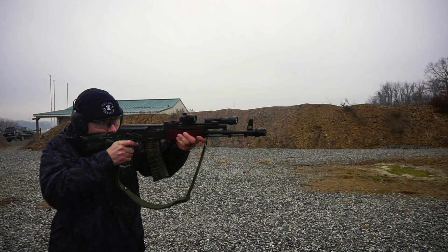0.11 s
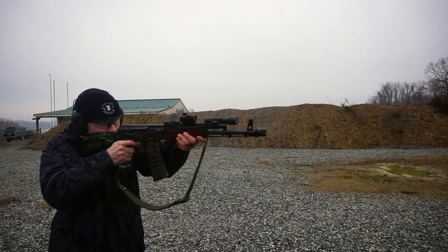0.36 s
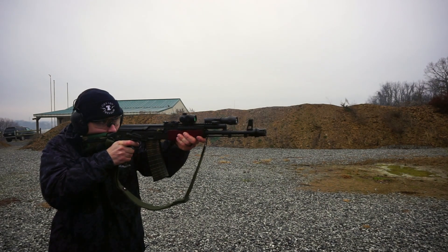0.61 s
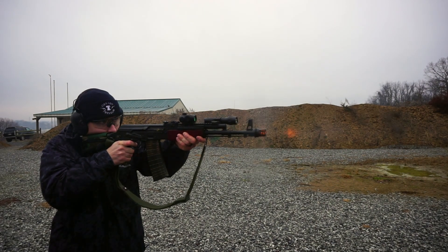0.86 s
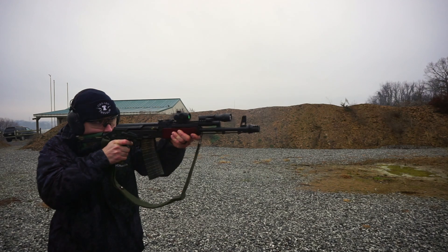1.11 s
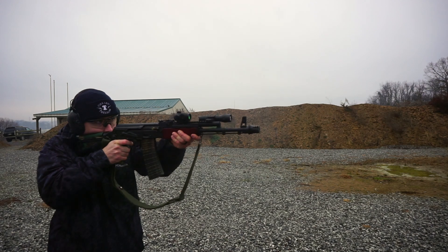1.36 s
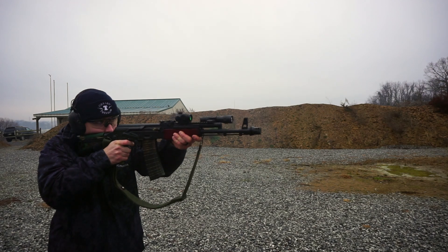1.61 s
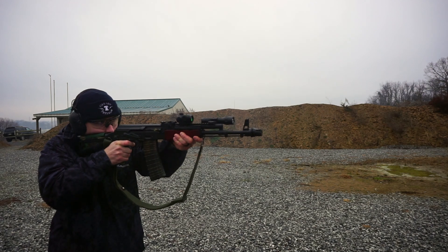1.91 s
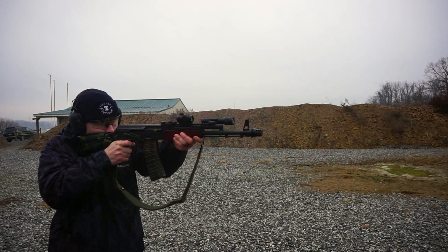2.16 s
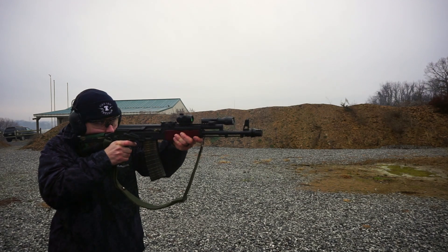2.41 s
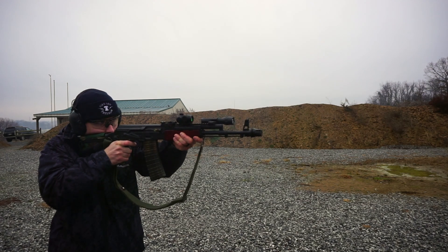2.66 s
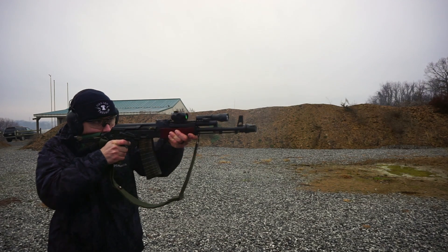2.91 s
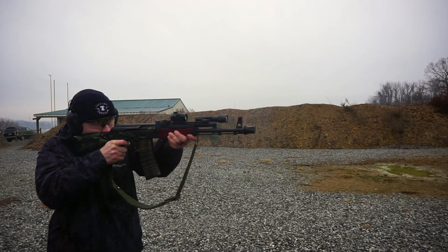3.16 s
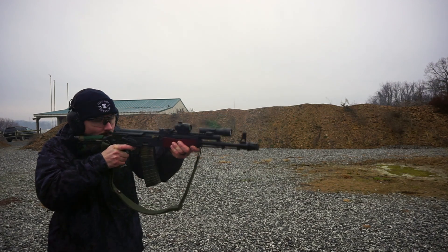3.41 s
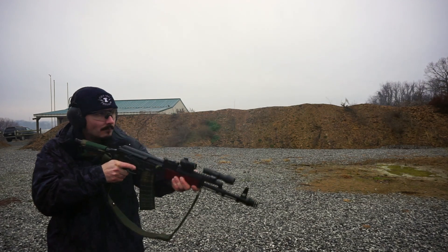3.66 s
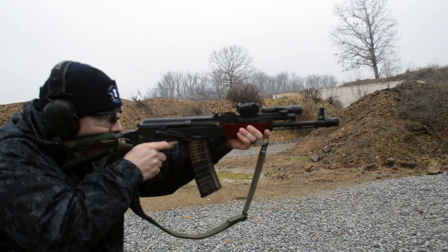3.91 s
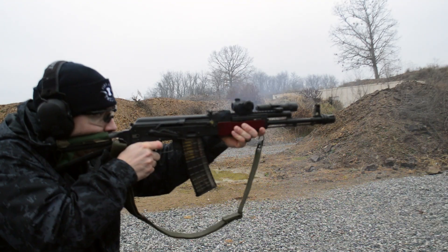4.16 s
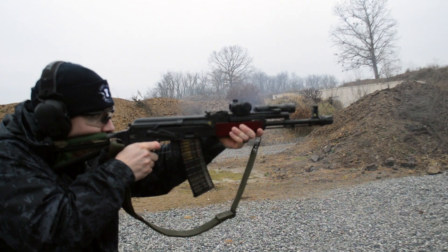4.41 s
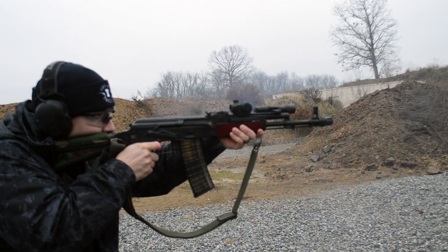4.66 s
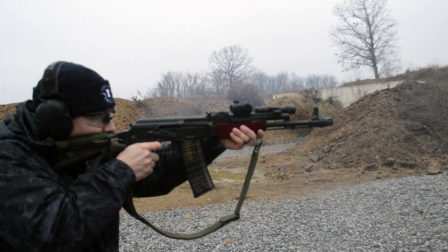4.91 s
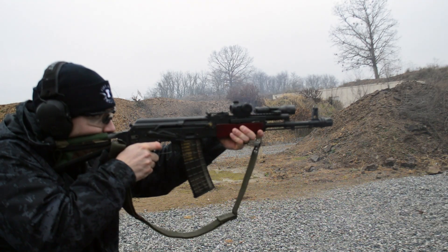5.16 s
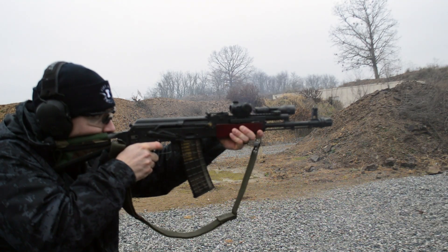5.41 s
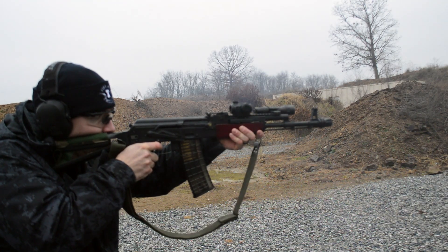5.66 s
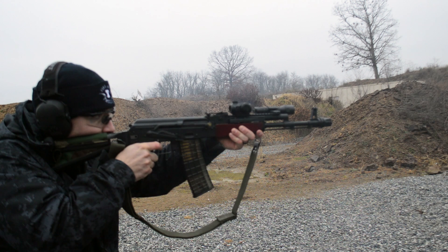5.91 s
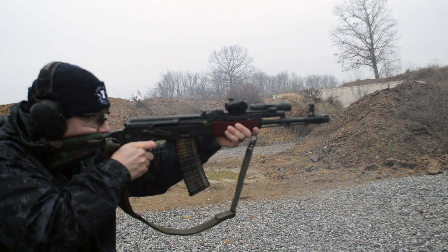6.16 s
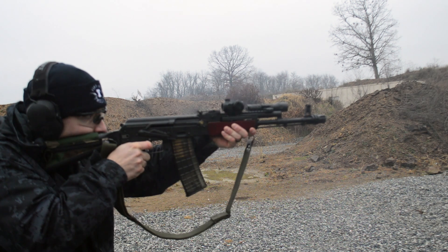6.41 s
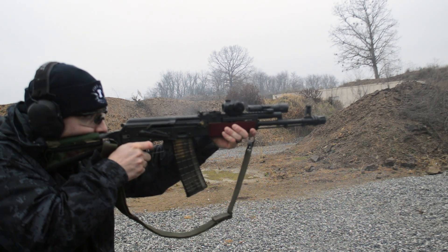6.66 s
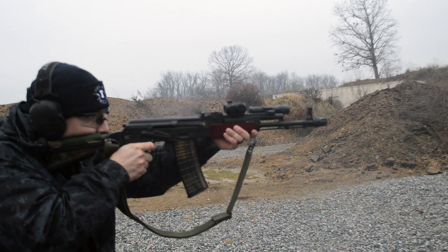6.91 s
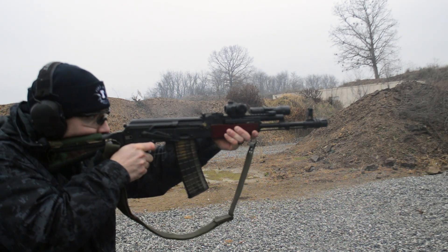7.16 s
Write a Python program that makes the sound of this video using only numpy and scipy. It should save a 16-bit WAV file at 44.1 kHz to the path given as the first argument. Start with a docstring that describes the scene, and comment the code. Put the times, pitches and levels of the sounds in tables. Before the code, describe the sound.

An outdoor gravel range between earth banks, light low wind. It opens on the fading roll of an earlier shot, with tiny brass clinks on stones in the first 0.3 s. At about 0.9 s a rifle shot cracks, restrained in stereo, with bolt clatter, sharp slaps off the banks within a third of a second, and a long, dulling echo. A case clicks around 1.9 and 2.3 s. A second similar shot comes at 2.8 s, with a case ticking at 3.3 s. At 3.8 s the sound cuts to a close mono microphone with louder windy hiss. A small tick, then at 4.0 s a huge overloaded blast with hard slaps and rolling echo. A low hum wavers from 4.9 to 5.9 s; brass rings brightly at 5.2-5.4 s. Another loud blast hits at 6.05 s, its echoes fading as a last case tinkles from 7.0 to 7.25 s.

```python
"""Rifle shots roll across an open gravel range between earth banks: crack, blast, bolt clatter, slaps off
the banks, a long roll of echoes, and spent cases bouncing on the stones. A stereo camera that holds the
blast down is heard first, then, after a cut, a louder mono camera that overloads; a low hum swells late.
Shaped noise makes the crack, clatter, roll, wind and hum; pressure pulses make the slaps; decaying sines
make the brass."""
import sys
import numpy as np
from scipy import signal
from scipy.fft import rfft, irfft, next_fast_len
from scipy.io import wavfile
from scipy.ndimage import uniform_filter1d

SR = 44100
rng = np.random.default_rng(int(sys.argv[2]) if len(sys.argv) > 2 else 0)


def voltage_ratio(decibels):
    """Convert decibels (scalar or array-like) to amplitude ratios, 20 dB per decade."""
    exponent = np.asarray(decibels, float) / 20
    return 10 ** exponent


def wav_record(signal):
    """Record a signal, one row per channel, as 16-bit PCM in the file named by sys.argv[1]."""
    frames = np.transpose(np.atleast_2d(signal))
    bounded = np.clip(frames, -1, 1)
    # unit amplitude maps onto the largest positive 16-bit level
    quanta = np.round(bounded * 32767).astype(np.int16)
    wavfile.write(sys.argv[1], SR, quanta)


N = 321489
CUT_S = 3.777  # wide camera before, close camera after

# spectrum of bright sounds at the rifle, close camera: (frequency [Hz], relative level [dB])
CLOSE_BRIGHT = [(880, 3), (1500, -2.5), (1830, 1), (2830, -0.5), (4000, 0.5), (4690, -3), (7540, -0.5),
                (10600, -7.5), (16000, -6)]
# band of the far drone and the hum, close camera: (centre [Hz], width [Hz])
CLOSE_DRONE = (254, 62)


def evened(x):
    """Scales to an rms of 1."""
    return x / np.sqrt(np.mean(x ** 2) + 1e-20)


def read(points, hz):
    """Interpolates a curve over log frequency."""
    f, value = np.transpose(points)
    return np.interp(np.log(hz + 1), np.log(f + 1), value)


def add(mix, start_s, sound):
    """Adds a sound in place, trimming what falls outside the mix."""
    at = round(start_s * SR)
    part = mix[..., max(at, 0):][..., :max(sound.shape[-1] + min(at, 0), 0)]
    part += sound[..., max(-at, 0):][..., :part.shape[-1]]


def colour(x, points):
    """Filters by a spectrum and sets the rms to 1."""
    hz = np.fft.rfftfreq(x.shape[-1], 1 / SR)
    return evened(irfft(rfft(x) * voltage_ratio(read(points, hz)), x.shape[-1]))


def band_noise(noise, band):
    """Limits noise to a (centre [Hz], width [Hz]) band at an rms of 1."""
    centre_hz, width_hz = band
    edges_hz = [centre_hz - width_hz / 2, centre_hz + width_hz / 2]
    return evened(signal.sosfilt(signal.butter(2, edges_hz, "band", fs=SR, output="sos"), noise))


def stereo(mid, side, wide):
    """Two close capsules: bass alike, treble unrelated."""
    # (frequency [Hz], side minus mid [dB] at wide = 1)
    spread = [(60, -22.5), (150, -42), (380, -15), (950, -1.5), (2380, 1), (5980, 5.5), (15000, 1)]
    hz = np.fft.rfftfreq(len(side), 1 / SR)
    side = wide * irfft(rfft(side) * voltage_ratio(read(spread, hz)), len(side))
    return np.array([mid + side, mid - side])


def burst(t, hold_s, t60_s):
    """Envelope of an impact: 0.39 ms rise, hold, exponential decay."""
    return np.clip(t / 0.00039, 0, 1) * voltage_ratio(-60 * np.maximum(t - hold_s, 0) / t60_s)


def ringing(noise, hz, q=3., db=-5.):
    """Noise with a broad resonance laid over it."""
    peak = signal.lfilter(*signal.iirpeak(hz, q, fs=SR), noise)
    return evened(noise + voltage_ratio(db) * evened(peak))


def echoes(t, rows, swell_db_per_s):
    """Levels of thud and hiss: each answer swells, holds and fades; their powers add."""
    s, thud_db, hiss_db, hold_s, fade_db_per_s = np.transpose(rows)[..., None]
    early_s, late_s = np.maximum(s - t, 0), np.maximum(t - s - hold_s, 0)
    shape = voltage_ratio(-swell_db_per_s * early_s - fade_db_per_s * late_s)
    return [np.sqrt(((voltage_ratio(db) * shape) ** 2).sum(0)) for db in (thud_db, hiss_db)]


def swells(t, rows):
    """Level of the drone: swells tent-shaped in dB whose powers add."""
    s, db, fall_s = np.transpose(rows)[..., None]
    return np.sqrt((voltage_ratio(db - 10 * abs(t - s) / fall_s) ** 2).sum(0))


def blast(db, ms):
    """Overpressure then suction, rounded by the way it has travelled."""
    ms = np.clip(ms, .12, .6)
    u = np.arange(400) / SR / (ms / 1000)
    band = signal.butter(2, [230, 400 / ms], "band", fs=SR, output="sos")
    wave = signal.sosfilt(band, (1 - u) * np.exp(-u))
    return voltage_ratio(db) * wave / abs(wave).max()


def tree_hiss(noise, hiss, t, lead_s, wide):
    """Treble of the roll, duller the longer its path through the air."""
    # extra loss in the air: (frequency [Hz], wide camera's paths [dB/s], close camera's paths [dB/s])
    air_loss = [(2500, 0, 1), (3670, 6.5, 6.5), (5460, 18.5, 17), (8000, 35.5, 29.5), (11730, 54.5, 72),
                (16000, 88.5, 86)]
    hz, frame_s, z = signal.stft(colour(noise, hiss), SR, nperseg=512)
    loss_db_per_s = read([(f, loss[0] if wide else loss[1]) for f, *loss in air_loss], hz)[:, None]
    path_s = np.clip(frame_s - lead_s, 0, 1)  # echoes after 1 s grow no duller
    trees = signal.istft(z * voltage_ratio(-loss_db_per_s * path_s), SR, nperseg=512)[1][:, :len(t)]
    # unit level in 1.5-4 kHz over the first quarter second
    reference = signal.butter(4, [1500, 4000], "band", fs=SR, output="sos")
    return trees / signal.sosfilt(reference, trees[0, :SR // 4]).std()


def shot(hits, knocks, slaps, roll, swell_db_per_s, drones, thud, hiss, bright, drone, ground, wide):
    """The ground scatters every shot alike; moving air changes a small share."""
    # (time after firing [s], L-R at wide = 1 [dB])
    pan = [(0, 0.5), (.15, -4.5), (.35, -1), (.55, 1), (.7, 3.5), (1.0, -1), (1.3, -7.5)]
    lead_s, same = .05, .93
    t = np.arange(ground.shape[1]) / SR - lead_s
    fresh = rng.standard_normal(ground.shape) * ground.std(1)[:, None]
    white = same * ground + np.sqrt(1 - same ** 2) * fresh

    # channel pairs are mid and side
    banks = colour(white[:2], thud)
    trees = tree_hiss(white[2:4], hiss, t, lead_s, wide)
    far = band_noise(white[4:6], drone)
    thud_level, hiss_level = echoes(t, roll, swell_db_per_s)
    both = thud_level * banks + hiss_level * trees + swells(t, drones) * far
    both *= np.clip(t / 0.0055, 0, 1)

    near = slice(0, 16384)
    clatter = colour(white[6:8, near], bright)
    # nearby ground answers higher than the banks
    knock = ringing(banks[:, ::-1][:, near], 1000, q=4.5, db=-1.5)
    for after_s, db, hold_s, t60_s, ring_hz in hits:
        both[:, near] += voltage_ratio(db) * burst(t[near] - after_s, hold_s, t60_s) * ringing(clatter, ring_hz)
    for after_s, db, hold_s, t60_s in knocks:
        both[:, near] += voltage_ratio(db) * burst(t[near] - after_s, hold_s, t60_s) * knock
    for after_s, db, ms in slaps:
        add(both, lead_s + after_s, blast(db, ms) * np.array([[1], [.3]]))

    pan_db = wide * np.interp(t, *np.transpose(pan)) * np.array([[.5], [-.5]])
    return stereo(*both, wide) * voltage_ratio(pan_db) * np.clip((t[-1] - t) / .1, 0, 1)


def volley(times_s, *place, wide):
    """Many small uneven reflectors make the thud slightly lumpy; the other layers are dense."""
    size = 3 * 2 ** 15
    ground, out = rng.standard_normal((8, size)), np.zeros((2, N))
    ground[:2] *= rng.random(size) < 5000 / SR  # about 5000 reflections a second
    for s, later_s in zip(times_s, times_s[1:] + [N / SR]):
        sound = shot(*place, ground, wide)
        add(out, s - .05, sound[:, :round((later_s - s + .06) * SR)])
    return out


def wide_shots():
    """Shots at the wide camera; the first, fired before the start, leaves only its roll."""
    # firing times [s]
    times_s = [-1.139, .9218, 2.7832]
    # crack and steel clatter: (time after firing [s], level [dB], hold [s], t60 [s], ring [Hz])
    hits = [(-.005, -28.5, .001, .027, 7000), (0, -28.5, .003, .067, 12500),
            (0.02, -24.5, .004, .22, 13000), (0.059, -24.5, .01, .05, 13000),
            (.078, -20, .0019, .05, 11000), (0.115, -27, .011, .13, 3500)]
    # dull knocks, blast and nearby ground: (time after firing [s], level [dB], hold [s], t60 [s])
    knocks = [(0, -28.5, .003, .067), (.007, -22, 0.0015, 0.04), (.023, -30.5, .004, .22),
              (.054, -27, .012, .1), (.111, -33.5, .011, .13)]
    # slaps off banks and roof: (time after firing [s], peak [dB], length [ms], limited in blast())
    slaps = [(.0075, -15, 0.55), (0.1577, -6.5, 0.83), (.179, -10, .43), (0.2004, -8, 0.29),
             (.238, -9, 0.49), (.261, -8.5, .41), (.331, -8.5, 0.34), (.5, -19.5, 0.24)]
    # answering banks and trees: (time after firing [s], thud [dB], hiss [dB], hold [s], fade [dB/s])
    roll = [(.001, -41, -29, 0.006, 351.5), (.11, -28, -29.5, .02, 130.5), (0.194, -14, -22, .05, 52),
            (0.305, -17.5, -27.5, 0.066, 114), (.43, -21.5, -28.5, .005, 97), (0.999, -54.5, -57, 0.18, 31)]
    # drone swells: (peak time after firing [s], level [dB], time to fall 10 dB either way [s])
    drones = [(.11, -30, 0.07), (.3, -33.5, 0.09), (.43, -34, 0.08), (1.4, -53, .2), (1.8, -54.5, .25)]
    # spectra of thud, hiss and bright sounds: (frequency [Hz], relative level [dB])
    thud = [(35, -60), (60, -28), (155, -13.5), (226, -13.5), (281, -15.5), (422, 0), (674, -2.5),
            (965, -10), (1470, -15), (1770, -16), (2500, -26.5), (3250, -42), (5500, -120)]
    hiss = [(410, -25), (700, -1), (819, -8.5), (1680, -9.5), (2960, -10), (6480, -15), (7010, -14),
            (9860, -12), (16000, -12.5)]
    bright = [(880, -36.5), (1500, -12), (2080, -2), (2460, -4.5), (2830, -3.5), (7030, -7), (11100, -6),
              (14900, -8.5), (16000, -10)]
    # far drone: (centre [Hz], width [Hz])
    drone = (309, 79)
    # extra near reflection of one shot: (time [s], peak [dB], length [ms])
    side_slap = (2.902, -7, 0.22)
    out = volley(times_s, hits, knocks, slaps, roll, 420, drones, thud, hiss, bright, drone, wide=0.75)
    add(out, side_slap[0], blast(*side_slap[1:]) * np.array([[1.2], [.8]]))
    return out


def air(points, db, wide):
    """Steady background whose level drifts by 1 dB rms."""
    drift_db = evened(uniform_filter1d(uniform_filter1d(rng.standard_normal(N), 4000), 4000))
    noise = colour(rng.standard_normal((2, next_fast_len(N))), points)
    return voltage_ratio(db + drift_db) * stereo(*noise, wide)[:, :N]


def wide_air():
    """Light wind as coloured noise, plus faint white preamp hiss."""
    # (frequency [Hz], relative level [dB])
    wind = [(12, -30.5), (20, -17), (97, -7.5), (142, -5), (207, -15.5), (234, -17), (283, -10), (395, -26),
            (848, -26.5), (6000, -74.5), (7800, -75), (13200, -84.5)]
    return air(wind, -51.5, 1.0) + voltage_ratio(-80) * rng.standard_normal((2, N))


def case():
    """Each bounce clicks on a stone and rings the brass until the next contact damps it."""
    # brass modes: (landing on its side [dB], landing on its end [dB], t60 [s])
    mode_rows = [(3, -6, 0.28), (-4, -4, 0.41), (-47, -18, 0.65), (-12, -54, .08), (-1, -45, 0.1),
                 (-16, 0, 0.17), (-13, -40, 0.2), (-42, 1, .2), (-8, 6.5, 0.24)]
    # their pitches [Hz]
    mode_hz = [10760, 10812, 13600, 14090, 14285, 14880, 15120, 15205, 15305]
    # (time [s], stone click [dB], click centre [Hz], lowest mode pair [dB], upper modes [dB])
    bounces = [(.0742, -39, 13600, -50.5, -39), (.1898, -26, 2760, -64, -70), (.29, -55, 9000, -53, -46),
               (1.8726, -32.5, 13200, -46.5, -40), (2.3256, -26, 9300, -70, -73),
               (3.3414, -16, 8900, -77, -62), (3.7434, -41, 1710, -55.5, -54),
               (5.2076, -17, 13000, -29, -10.5), (5.323, -3.5, 8950, -44, -45),
               (5.425, -31, 6860, -39, -24), (7.007, -12, 6500, -38, -9.5), (7.031, -47, 6000, -26, -30),
               (7.039, -45, 6500, -32, -24), (7.13, -42, 7000, -55, -39), (7.164, -53.5, 9000, -48, -40),
               (7.245, -48.5, 8800, -58, -51)]
    # spent cases: (first contact [s], share landing on its end [0-1], L-R [dB])
    cases = [(.0742, .1, 3), (1.8724, .9, -2), (3.3416, .2, 6), (5.2082, .05, 0), (7.0074, .97, 0)]
    # (flutter rate [Hz], depth [0-1])
    tumble = (28, .6)
    # stone click spectrum: (frequency [Hz], relative level [dB])
    stone = [(290, -47), (500, -6), (1720, 3), (2610, -6.5), (3980, -3), (5550, -9), (7000, -7),
             (13600, -7), (16000, -10)]
    out, t = np.zeros((2, N)), np.arange(16384) / SR
    side_db, end_db, t60_s = np.transpose(mode_rows)[..., None]
    modes = voltage_ratio(-60 * t / t60_s) * np.sin(2 * np.pi * np.outer(mode_hz, t))
    for bounce, later in zip(bounces, bounces[1:] + bounces[:1]):
        s, click_db, click_hz, low_db, high_db = bounce
        end, pan_db = [row[1:] for row in cases if row[0] - .01 < s][-1]
        struck = ((1 - end) * voltage_ratio(side_db) + end * voltage_ratio(end_db)) * modes
        # the case tumbles in the air, so each mode turns towards the microphone and away
        turn = tumble[0] * t + rng.random((len(mode_rows), 1))
        struck *= 1 + tumble[1] * np.sin(2 * np.pi * turn)
        ring = voltage_ratio(low_db) * struck[:2].sum(0) + voltage_ratio(high_db) * struck[2:].sum(0)
        gap_s = (later[0] - s) % (N / SR)
        ring *= np.clip((gap_s - t) / .003 + 1, 0, 1) * np.clip((t[-1] - t) / .05, 0, 1)
        click = ringing(colour(rng.standard_normal((2, len(t))), stone), click_hz, q=2.5, db=-3.)
        # sharp tick with a weaker, longer tail
        click = click * (burst(t, 0.00033, 0.011) + voltage_ratio(-17.5) * burst(t, 0.0039, 0.057))
        sound = ring + voltage_ratio(click_db) * stereo(click[0], 0.75 * click[1], s < CUT_S)
        add(out, s, sound * voltage_ratio(np.array([[.5], [-.5]]) * pan_db))
    return out


def close_air():
    """Wind and preamp hiss as coloured noise, mono."""
    # (frequency [Hz], relative level [dB])
    wind = [(12, -46), (20, -13), (93, -1), (172, -3), (301, -6.5), (347, -16), (399, -19.5), (1000, -20),
            (1090, -27), (1190, -22), (2320, -33), (16000, -36.5)]
    return air(wind, -36.5, 0)


def trigger_tick():
    """Short resonant noise tick before the first close shot; returns its time [s] and sound."""
    # (time [s], level [dB], hold [s], t60 [s], ring [Hz])
    tick_row = (3.9534, -27, .003, .025, 6900)
    s, db, hold_s, t60_s, hz = tick_row
    tick = ringing(colour(rng.standard_normal(4096), CLOSE_BRIGHT), hz)
    return s, voltage_ratio(db) * tick * burst(np.arange(4096) / SR, hold_s, t60_s)


def close_shots():
    """Shots at the close camera, in mono; columns as in wide_shots()."""
    # firing times [s]
    times_s = [3.9933, 6.0552]
    # crack and clatter: (time after firing [s], level [dB], hold [s], t60 [s], ring [Hz])
    hits = [(-.008, -19, 0.0032, 0.039, 5000), (-.005, 0, 0.0011, 0.007, 6960), (0, 5.5, 0.008, 0.11, 9460),
            (0.0685, -10, .002, 0.024, 6500), (0.0758, -1.5, 0.003, 0.036, 8000),
            (0.114, -9, 0.0016, 0.12, 3450), (.124, -9, .001, .043, 3300), (.151, -5, .001, 0.018, 3840),
            (.161, -9, .001, 0.04, 3530)]
    # dull knocks: (time after firing [s], level [dB], hold [s], t60 [s])
    knocks = [(0, -4, 0.0083, 0.083), (.015, -9, 0.00075, 0.066), (.056, -11, 0.02, 0.04),
              (.115, -13, .0025, .064), (.151, -14, 0.00092, 0.012)]
    # slaps: (time after firing [s], peak [dB], length [ms], limited in blast())
    slaps = [(0.0167, -2, 0.8), (.161, 3, 0.18), (0.1626, 5.5, 0.5), (.178, 0.5, 0.33), (0.224, -18, 0.84),
             (0.238, -6, 0.45), (.243, -3, 0.4), (0.25, -0.5, .4), (.31, -4, 0.44), (.497, -10, .4)]
    # roll: (time after firing [s], thud [dB], hiss [dB], hold [s], fade [dB/s])
    roll = [(.03, -15, -22, .01, 60), (.08, -22, -22, 0.048, 150), (.2, -11.5, -16, 0.024, 30.24),
            (.245, -14.5, -47, .005, 249), (.42, -14, -29, 0.01, 300), (.5, -20.5, -38, .005, 300),
            (.64, -24, -26.5, 0.028, 67.6), (1.08, -38, -41, .005, 20.4)]
    # drone swells: (peak time after firing [s], level [dB], time to fall 10 dB either way [s])
    drones = [(.06, -23.5, .05), (.14, -16.5, 0.032), (.3, -51, .15), (.48, -29, .03), (.8, -46, .12),
              (1.16, -56, 0.086), (1.7, -64, .4)]
    # spectra of thud and hiss: (frequency [Hz], relative level [dB])
    thud = [(35, -58), (60, -46), (151, -17), (329, -11), (442, 0.5), (660, 2), (790, -4), (980, -12),
            (1430, -7.5), (1690, -9.5), (2500, -21), (3250, -38), (5500, -120)]
    hiss = [(410, -17.5), (700, -12.5), (852, -3), (1080, -6), (1660, -12), (3410, -8), (3840, -8.5),
            (9480, -11), (16000, -16.5)]
    return volley(times_s, hits, knocks, slaps, roll, 350, drones, thud, hiss,
                  CLOSE_BRIGHT, CLOSE_DRONE, wide=0)


def low_hum():
    """Narrow noise in the band of the far drone, swelling and wavering."""
    start_s, length_s, fade_s, level_db, waver_rms_db = 4.9, 1.0, 0.097, -35.5, 4
    t = np.arange(N) / SR - start_s
    noise = band_noise(rng.standard_normal(N), CLOSE_DRONE)
    waver = evened(uniform_filter1d(uniform_filter1d(rng.standard_normal(N), 1500), 1500))
    fade = np.clip(np.minimum(t, length_s - t) / fade_s, 0, 1)
    return noise * voltage_ratio(level_db + waver_rms_db * waver) * fade


def scene():
    """The wide camera, then the close one; the cases bounce through both."""
    wide = wide_shots() + wide_air()
    close = close_shots() + close_air() + low_hum()
    add(close, *trigger_tick())
    return np.where(np.arange(N) < CUT_S * SR, wide, close) + case()


def gain_control(x, knee_db, share, fall_db_per_s):
    """Cuts a share of the excess over the knee within milliseconds; the held peak then falls steadily."""
    power_db = 10 * np.log10(abs(uniform_filter1d((x ** 2).mean(0), 600, origin=299)) + 1e-12)
    ramp_db = np.arange(N) * fall_db_per_s / SR
    held_db = np.maximum.accumulate(power_db + ramp_db) - ramp_db
    over_db = np.maximum(held_db - knee_db, 0)
    return x / voltage_ratio(share * uniform_filter1d(over_db, 200, origin=99))


def low_pass(x):
    """Removes everything above the highest recorded frequency."""
    return signal.sosfilt(signal.butter(12, 16470, fs=SR, output="sos"), x)


def record(dry):
    """Each camera's gain control, then overload on the loudest peaks and the band limit."""
    wide = gain_control(dry, -41.5, share=0.13, fall_db_per_s=49.5)
    close = gain_control(dry, -27.5, share=0.23, fall_db_per_s=91.0)
    level = np.where(np.arange(N) < CUT_S * SR, wide, close)
    clipped = level / (1 + abs(level) ** 12) ** (1 / 12)
    limited = signal.oaconvolve(clipped, signal.firwin(255, 15900, fs=SR)[None], "same")
    return low_pass(limited)


dry = scene()
out = record(dry)
wav_record(out)
```